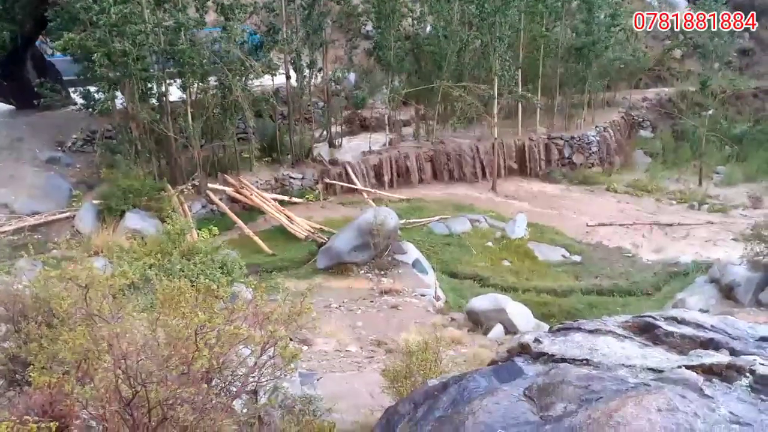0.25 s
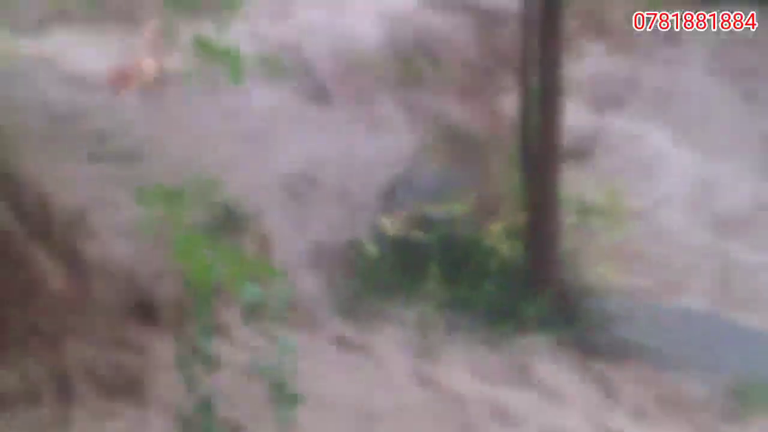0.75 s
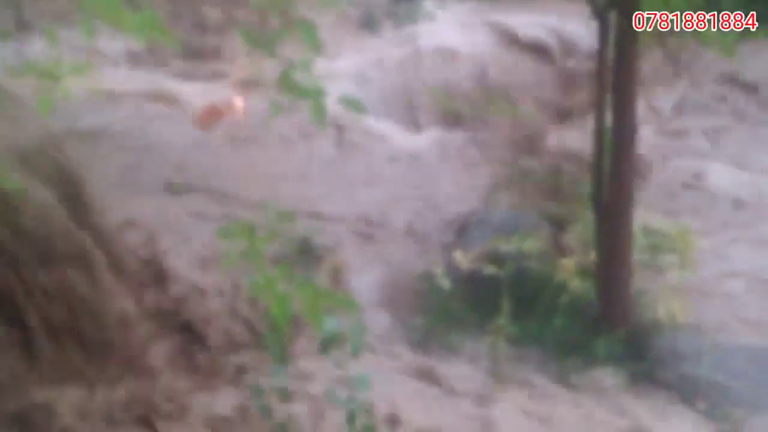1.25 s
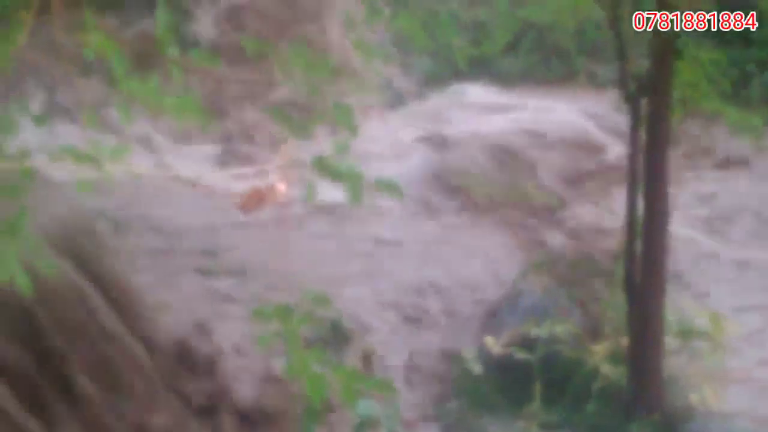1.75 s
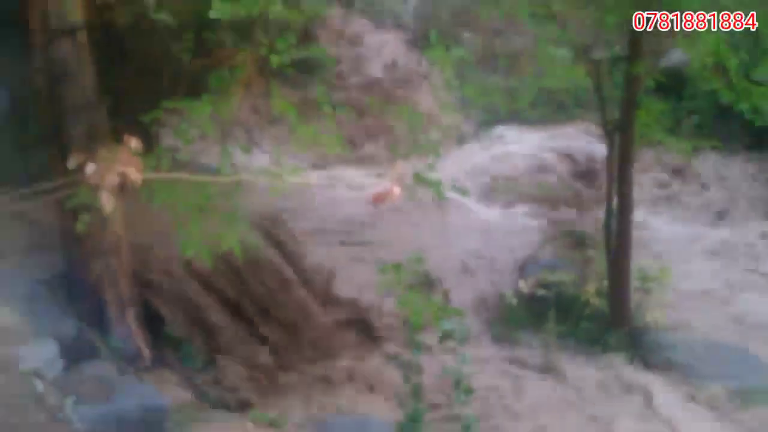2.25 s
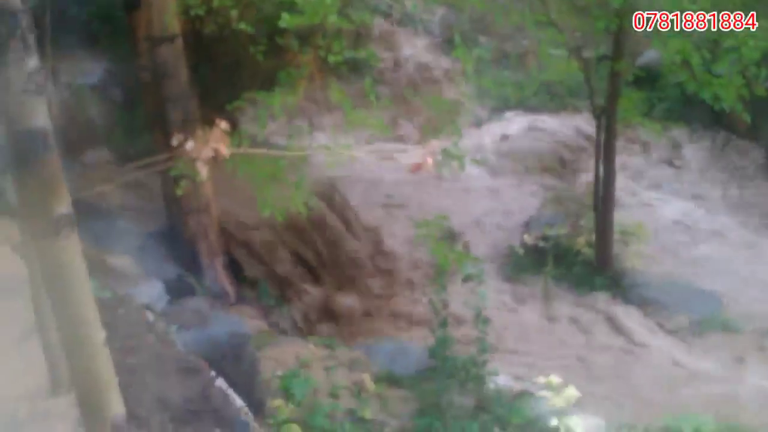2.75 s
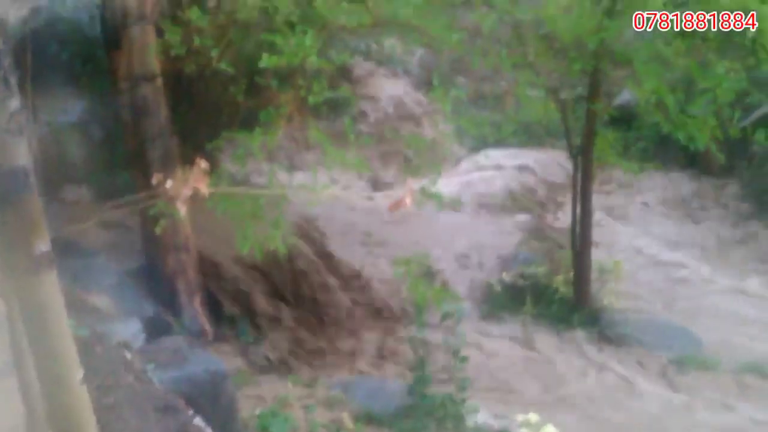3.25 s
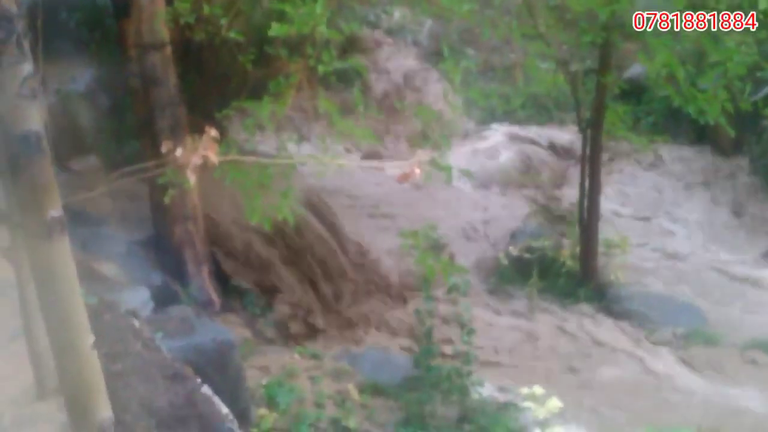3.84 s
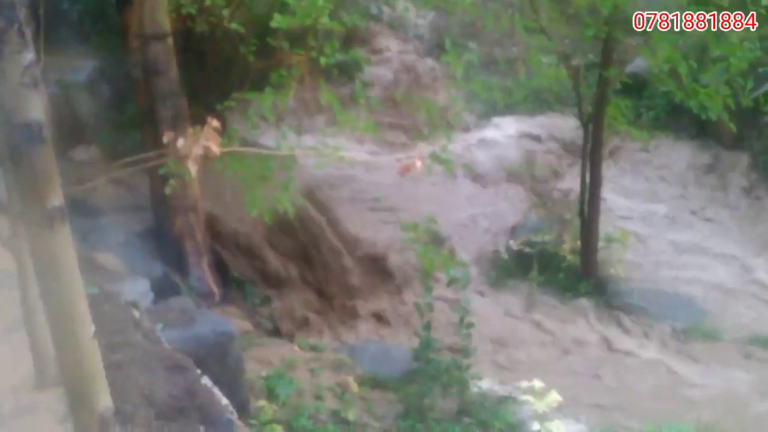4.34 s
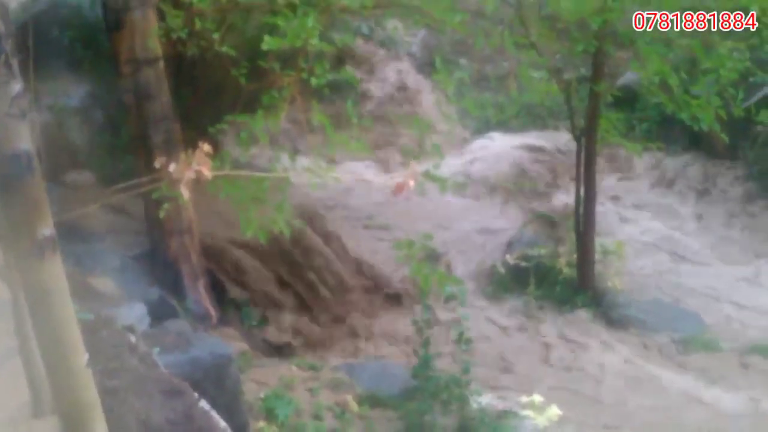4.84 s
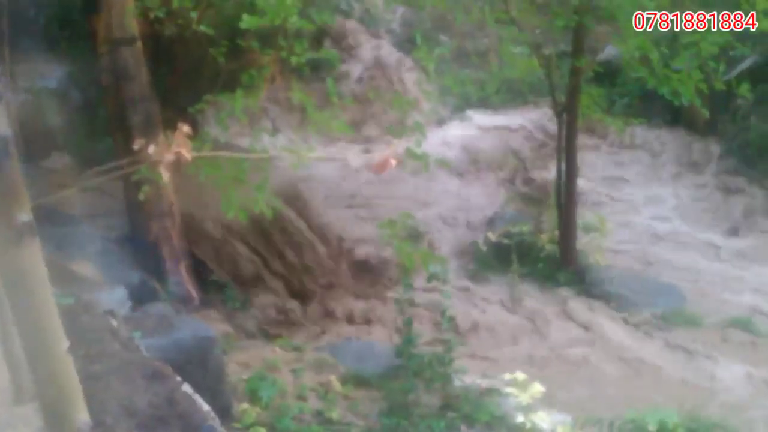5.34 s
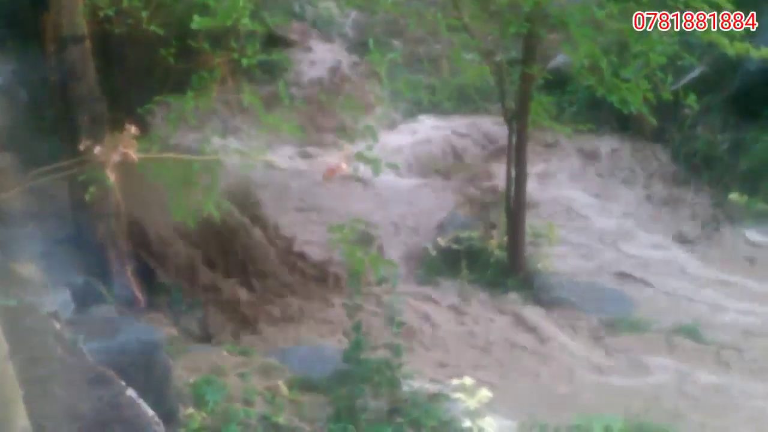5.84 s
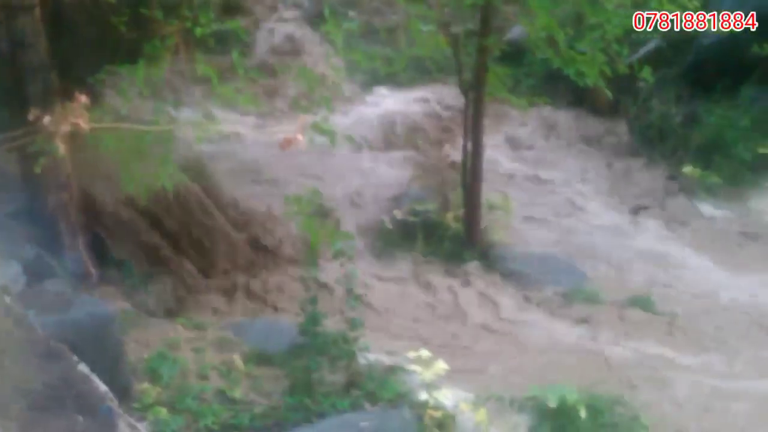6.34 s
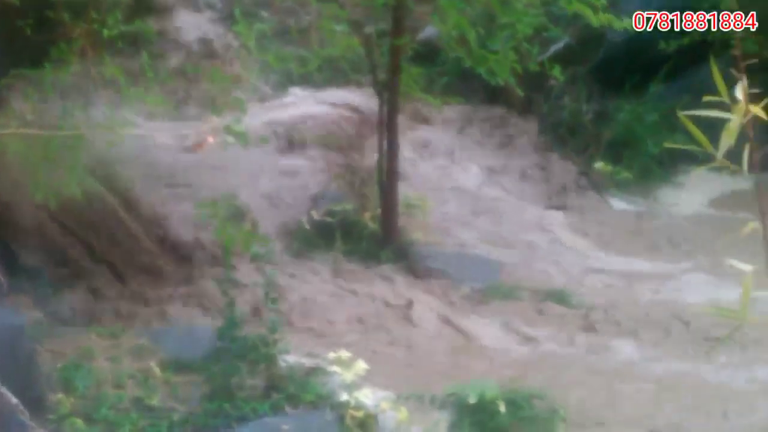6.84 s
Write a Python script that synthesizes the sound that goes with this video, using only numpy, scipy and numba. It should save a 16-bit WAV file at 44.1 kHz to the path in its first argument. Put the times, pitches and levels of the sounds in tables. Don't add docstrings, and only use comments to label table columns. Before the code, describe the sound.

Fat raindrops thump and spatter on taut fabric for half a second, then silence, then a close muddy torrent roars, later growing muffled and gurgling.

```python
import sys
import numpy as np
from scipy import signal
from scipy.fft import rfft, irfft
from scipy.io import wavfile
from scipy.ndimage import uniform_filter1d
from numba import njit

SR = 44100
rng = np.random.default_rng(int(sys.argv[2]) if len(sys.argv) > 2 else 0)


def natural_amplitude(level_db):
    exponent = np.asarray(level_db, float) / 20
    return 10 ** exponent


def materialize(psi):
    bounded = np.clip(np.atleast_2d(psi).T, -1, 1)
    quanta = np.round(bounded * 32767).astype(np.int16)
    wavfile.write(sys.argv[1], SR, quanta)


N = 312228
TIME = np.arange(N) / SR
HZ = np.maximum(np.arange(N // 2 + 1) * SR / N, 1)

# (frequency [Hz], density [dB per Hz])
RAIN_COLOUR = [(18, -51.5), (30, -21), (117, 0), (236, -4), (359, -0.5), (574, -12), (944, -5.5),
               (1100, -10), (3060, -12.5), (7630, -15), (9650, -20.5), (11900, -18), (15400, -22)]
# (frequency [Hz], likeness [0-1])
RAIN_LIKENESS = [(60, 0.87), (130, 0.96), (290, 0.94), (640, 0.9), (1410, 0.17), (3100, 0.03), (6820, 0),
                 (15000, 0.12)]
# (frequency [Hz], left minus right [dB])
RAIN_LEAN = [(60, 5.5), (110, 2), (200, 3), (380, 0.5), (700, 9), (1290, 0.5), (2380, 1.5), (4400, 1.5),
             (8120, -0.5), (15000, -2)]
RAIN_DB, RAIN_TOP_HZ, RAIN_END_S = -26.5, 15550, 0.4962

# (time [s], peak [dB], centre [Hz])
SPATTERS = [
    (0.0165, -9, 4900),
    (0.0658, -16, 6500),
    (0.0834, -12.5, 8500),
    (0.1552, -14.5, 4500),
    (0.1853, -14.5, 7500),
    (0.335, -17.5, 4000),
    (0.38, -18, 5000),
    (0.4152, -16, 4970),
    (0.415, -18.5, 11500),
]
SPATTER_FADE_S = 0.0012
# (time [s], peak [dB], fabric pitch [Hz], right port's lead [ms])
DROPS = [(0.0166, -8, 1580, 0.011), (0.031, -10.5, 920, 0.27), (0.043, -13, 1470, 0.2),
         (0.065, -14, 1580, 0.45), (0.066, -1.5, 850, 0.024), (0.0683, -12.5, 670, 0.07),
         (0.0838, 0.5, 2000, 0.11), (0.086, -17.5, 690, 0.03), (0.096, -14.5, 1050, 0.32),
         (0.098, -16.5, 2010, 0.06), (0.1294, -14, 2440, -0.09), (0.1359, -9, 1100, 0.24),
         (0.1548, -2.5, 1370, 0.1), (0.1574, -1, 1290, 0.29), (0.1607, -17.5, 650, 0.18),
         (0.1837, -1, 1038, 0.14), (0.19, -15.5, 790, 0.24), (0.234, -16, 570, 0.18),
         (0.239, -12.5, 1050, 0.27), (0.2419, -11.5, 2000, 0.16), (0.3353, -4.5, 1460, -0.04),
         (0.277, -17.5, 1380, 0.25), (0.4148, -10.5, 1300, 0.02), (0.426, -13.5, 1580, 0.4),
         (0.4358, -15, 850, 0.45), (0.448, -17.5, 1300, 0.2), (0.4525, -17, 1300, 0.18),
         (0.457, -17, 1050, 0.27), (0.4684, -5, 1050, 0.01), (0.485, -16, 910, 0.22)]
FABRIC_CYCLES = 2.7
DROP_LEFT_DB = -1.2

# (frequency [Hz], density [dB per Hz])
CHURN_COLOUR = [(15, -40), (25, 1.5), (71, 0.5), (129, -3.5), (204, -2.5), (363, -8.5), (447, -13.5),
                (833, -9.5), (1070, -16), (1630, -10.5), (2350, -11.5), (3180, -17.5), (4810, -16),
                (6200, -18), (8060, -32), (13600, -120)]
# (from [Hz], to [Hz])
ZONES_HZ = [(30, 330), (520, 1000), (1200, 5000), (8500, 14000)]
ZONE_EDGES_HZ = [320, 557, 970, 1340]
OPEN_DB = [-21.5, -25.5, -21, -26]
DEPTH_DB = [8.5, 9.5, 14]
# (time [s], effort [0-1])
EFFORT = [(1.3, 0), (2.38, 0.02), (2.5, 0.55), (2.6, 0.8), (2.72, 0.99), (3.2, 0.9), (3.6, 0.95),
          (4.38, 0.92), (4.43, 0.73), (5.0, 0.76), (5.5, 0.73), (5.9, .78), (6.5, 0.76), (7.08, 0.79)]
# (frequency [Hz], gain [dB])
DUCKED = [(200, -1.5), (330, -1.5), (600, -2.4), (1700, 1), (2400, -3.5), (2800, 2), (3450, -3.5),
          (3900, -1), (5000, -8), (6000, -6.5)]
TORRENT_START_S, TORRENT_TOP_HZ = 1.0767, 14240
FADE_IN_S, FADE_FROM_DB = 0.24, -12

# (time [s], lift [dB])
SURGES = [(3.01, 1), (3.2, 0), (3.31, 1), (4.19, 2), (4.45, 1.5), (4.68, 5), (5.01, 8.5), (5.16, 1),
          (5.23, 4.5), (5.7, 2.5), (5.8, 6), (5.89, 5), (5.96, 6), (6.26, 1), (6.36, 3.5), (6.61, 0.5),
          (6.91, 3), (7.03, 6)]
SURGE_SHARE = [1, 0.19, 0.19]
SURGE_S = 0.037

# (frequency [Hz], density [dB per Hz])
SPRAY_COLOUR = [(3060, -43), (5200, -12.5), (7190, -5.5), (7850, -1.5), (10100, 0.5), (13700, -2.5),
                (14200, 0.5)]
# (time [s], lift [dB])
SPLASHES = [(5.7, 1), (5.8, 5), (5.88, 2.5), (5.97, 4.5), (6.05, 1.5), (6.31, 2.5), (6.38, 2), (6.46, 0),
            (6.59, 6), (6.64, 1), (6.91, 1.5), (7.04, 2)]
SPLASH_S = 0.028
SPRAY_CUT_S, SPRAY_SETTLE_S, SPRAY_DEPTH_DB = 5.364, 0.22, 11

# (time [s], peak [dB], pitch [Hz])
GULPS = [(2.832, -17.5, 620), (3.366, -18.5, 750), (3.489, -17.5, 920), (3.793, -16, 713),
         (3.831, -15.5, 790), (4.233, -22, 624), (4.436, -14, 680), (4.529, -12, 870), (4.703, -9.5, 670),
         (4.782, -11, 605), (5.039, -12, 790), (5.09, -23, 726), (5.131, -16, 850), (5.197, -16, 780),
         (5.435, -25, 710), (5.473, -14, 670), (5.538, -10, 702), (5.579, -16, 690), (6.029, -16, 738),
         (6.103, -19, 760), (6.19, -17, 902), (6.341, -12.5, 678), (6.411, -14.5, 736), (6.442, -18, 620),
         (6.496, -16, 920), (6.605, -18, 790), (6.663, -16, 1010), (6.744, -19, 790), (6.785, -21, 710),
         (6.887, -19, 616)]
# (time [s], peak [dB], pitch [Hz])
PLIPS = [(3.2553, -19, 2020), (4.2526, -18, 2050), (4.4067, -19, 1570), (4.4531, -21, 1880),
         (4.5314, -25, 1780), (4.8831, -16, 1610), (4.9819, -16, 1800), (5.0468, -13, 1300),
         (5.1645, -21, 2010), (5.2383, -14, 2200), (5.3371, -16, 1700), (5.4154, -22, 2090),
         (5.7143, -17, 2040), (5.7596, -23, 1950), (5.8075, -16, 1960), (5.9447, -16, 1830),
         (6.059, -18, 1840), (6.1343, -15, 1740), (6.4466, -23, 1550), (6.7304, -29, 1660),
         (6.8666, -17, 1700)]
GULP_CYCLES, PLIP_CYCLES = 52, 88
FROTH_S, FROTH_FROM_DB, FROTH_SLOPE = 0.035, -21.5, 0.25

# (time [s], from [Hz], to [Hz])
WIDE_MOMENTS = [(1.2022, 4130, 5170), (1.2022, 9650, 11700), (1.4112, 6200, 7580), (1.4112, 8960, 11700),
                (1.4576, 11700, 13780), (2.0846, 11700, 13100), (2.2007, 8270, 9650),
                (2.2007, 10340, 12400), (2.3168, 4650, 7580), (2.3168, 9650, 12400), (3.2224, 6200, 7580),
                (3.2688, 4650, 6890), (3.2688, 8960, 10340), (3.292, 5170, 6370), (3.292, 6890, 8960),
                (3.71, 8960, 11020), (4.871, 10340, 11700), (5.3818, 13100, 14240)]
WIDE_DB = -4.5


def on_log(table, hz):
    at, value = np.transpose(table)
    return np.interp(np.log(hz), np.log(at), value)


def level(x, db):
    return x * natural_amplitude(db) / np.sqrt(np.mean(x ** 2))


def zone_db(spectrum, zone):
    low, high = ZONES_HZ[zone]
    inside = (HZ > low) & (HZ < high)
    return 10 * np.log10(np.sum(abs(spectrum[inside]) ** 2) * 2 / N ** 2)


def bandpass(x, low_hz, high_hz):
    return signal.sosfilt(signal.butter(2, [low_hz, high_hz], "band", fs=SR, output="sos"), x)


def walk(rate):
    hold = int(SR / rate)
    steps = np.repeat(rng.standard_normal(N // hold + 1), hold)
    slow = uniform_filter1d(uniform_filter1d(steps, hold), hold)[:N]
    return slow / slow.std()


def bumps(table, t, width_s):
    return sum(db * np.exp(-((t - s) / width_s) ** 2) for s, db in table)


@njit
def rings(start, hz, cycles, size, glide, length):
    out = np.zeros(length)
    for k in range(len(start)):
        first = int(start[k]) + 1
        last = min(length, first + int(cycles[k] * SR / hz[k]))
        for i in range(first, last):
            turns = (i - start[k]) * hz[k] / SR
            fade = 1000 ** (-turns / cycles[k])
            out[i] += size[k] * np.sin(2 * np.pi * turns * (1 + glide * turns / 2)) * fade
    return out


def bubbles(count, low_hz, high_hz, cycles, spread_db, glide, end_s):
    when, pitch, loudness, sign = rng.random((count, 4)).T
    hz = low_hz * (high_hz / low_hz) ** pitch
    size = np.sign(sign - 0.5) * natural_amplitude(-spread_db * np.log(1 - 0.96 * loudness))
    cloud = rings(when * end_s * SR, hz, cycles + 0 * hz, size, glide, N)
    return cloud / np.sqrt(np.mean(cloud[:int(end_s * SR)] ** 2))


def rain():
    alike = np.clip(on_log(RAIN_LIKENESS, HZ), 0, 1)
    colour = natural_amplitude(on_log(RAIN_COLOUR, HZ))
    mid = rfft(rng.standard_normal(N)) * colour * np.sqrt(1 + alike)
    side = rfft(rng.standard_normal(N)) * colour * np.sqrt(1 - alike)
    lean = natural_amplitude(on_log(RAIN_LEAN, HZ) / 2)
    hiss = level(irfft(np.array([(mid + side) * lean, (mid - side) / lean]), N), RAIN_DB)
    patter = bubbles(count=250, low_hz=505.0, high_hz=2500.0, cycles=6.4, spread_db=1.0, glide=0.0, end_s=0.5)
    lagged = np.array([np.roll(patter, 8), patter])
    return hiss * natural_amplitude(0.63 * walk(8.1)) + natural_amplitude(-37.5) * lagged


def spatters():
    out = np.zeros((2, N))
    fade = np.exp(-TIME[:400] / SPATTER_FADE_S)
    for s, db, hz in SPATTERS:
        at = int(s * SR)
        burst = rng.standard_normal((2, 400)) * fade
        out[:, at:at + 400] += natural_amplitude(db) * bandpass(burst, hz / 1.7, min(hz * 1.35, 16000.0))
    return out


def drops():
    s, db, hz, lead_ms = np.transpose(DROPS).astype(float)
    ports = []
    for side in (1, -1):
        start = (s - (side < 0) * lead_ms / 1000) * SR
        size = natural_amplitude(db + side * DROP_LEFT_DB / 2)
        thump_hz = np.minimum(0.85 * hz, 1500.0)
        thump = rings(start, thump_hz, FABRIC_CYCLES + 0 * hz, natural_amplitude(2.7) * size, 0.0, N)
        slap = rings(start, 2.0 * hz, 10.0 + 0 * hz, natural_amplitude(-12.5) * size, 0.0, N)
        hits = np.bincount(start.astype(int), size, N)
        envelope = signal.lfilter([1], [1, -np.exp(-1 / (0.0016 * SR))], hits)
        ports.append(thump + slap + natural_amplitude(-16.5) * envelope * rng.standard_normal(N))
    return bandpass(ports, 420.0, 6000.0)


def fade_in_db(t):
    return FADE_FROM_DB * np.clip(1 - (t - TORRENT_START_S) / FADE_IN_S, 0, 1) ** 1.15


def water():
    fade = 1 / (1 + (HZ / 7600.0) ** 12) / (1 + (20.0 / HZ) ** 2)
    churn = rfft(rng.standard_normal(N)) * natural_amplitude(on_log(CHURN_COLOUR, HZ)) * fade
    churn *= natural_amplitude(-zone_db(churn, zone=2))
    gurgle = bubbles(count=700, low_hz=584.0, high_hz=959.0, cycles=19.4, spread_db=3.0, glide=0.023, end_s=7.08)
    slosh = bubbles(count=400, low_hz=88.0, high_hz=314.0, cycles=6.8, spread_db=5.0, glide=0.02, end_s=7.08)
    fizz = bubbles(count=2500, low_hz=1220.0, high_hz=2930.0, cycles=24.5, spread_db=4.0, glide=0.0062,
                   end_s=7.08)
    return churn + rfft(natural_amplitude(-11) * gurgle + natural_amplitude(-9.5) * slosh + natural_amplitude(-9) * fizz)


def suppressor(spectrum):
    hz, at, cells = signal.stft(irfft(spectrum, N), SR, nperseg=1024, noverlap=768)
    effort = np.clip(np.interp(at, *np.transpose(EFFORT)), 0, 1.2)
    surge_db = bumps(SURGES, at, SURGE_S)
    gain_db = np.array([OPEN_DB[k] - DEPTH_DB[k] * effort + SURGE_SHARE[k] * surge_db + fade_in_db(at)
                        - zone_db(spectrum, k) for k in range(3)])
    froth = [(s, FROTH_SLOPE * max(db - FROTH_FROM_DB, 0)) for s, db, _ in GULPS]
    gain_db[1] += bumps(froth, at, FROTH_S)
    place = on_log(list(zip(ZONE_EDGES_HZ, [0, 1, 1, 2])), hz + 1)
    share = np.clip(1 - abs(np.arange(3) - place[:, None]), 0, 1)

    power = abs(cells) ** 2
    power = np.minimum(power / np.mean(power, axis=1, keepdims=True), 8.0)
    lumps = uniform_filter1d(uniform_filter1d(power, size=5, axis=1), size=3, axis=0)
    patches = uniform_filter1d(rng.standard_normal(power.shape), size=14, axis=1)
    patches = uniform_filter1d(patches, size=7, axis=0)
    keep = lumps ** (0.02 + 0.21 * effort) * natural_amplitude((0.76 + 0.64 * effort) * patches / patches.std())

    zones = [(hz > low) & (hz < high) for low, high in ZONES_HZ[:3]]
    swell = [np.mean((keep * abs(cells))[zone] ** 2, axis=0) for zone in zones]
    steady = np.array([np.mean(abs(cells[zone]) ** 2) for zone in zones])
    keep /= share @ np.sqrt(uniform_filter1d(swell, size=21) / steady[:, None])
    keep *= natural_amplitude(on_log(DUCKED, hz + 1)[:, None] * effort ** 3) * (hz < 11000)[:, None]
    ducked = cells * keep * natural_amplitude(share @ gain_db)
    return signal.istft(ducked, SR, nperseg=1024, noverlap=768)[1][:N]


def spray():
    hiss = rfft(rng.standard_normal(N)) * natural_amplitude(on_log(SPRAY_COLOUR, HZ))
    hiss *= (HZ < TORRENT_TOP_HZ) / (1 + (4500.0 / HZ) ** 8)
    hiss *= natural_amplitude(-zone_db(hiss, zone=3))
    upper = np.clip((HZ - 9500.0) / 2100.0, 0, 1)
    halves = sum(irfft(hiss * part, N) * natural_amplitude(0.56 * walk(13)) for part in (upper, 1 - upper))
    cut = 1 - np.exp(-np.maximum(TIME - SPRAY_CUT_S, 0) / SPRAY_SETTLE_S)
    lift_db = bumps(SPLASHES, TIME, SPLASH_S) + 1.2 * cut * walk(13)
    return halves * natural_amplitude(OPEN_DB[3] + fade_in_db(TIME) - SPRAY_DEPTH_DB * cut + lift_db)


def air_pockets(table, cycles, trim_db, low_hz, high_hz):
    s, db, hz = np.transpose(table).astype(float)
    pockets = rings(s * SR, hz, cycles + 0 * hz, natural_amplitude(db + trim_db), 0.0017, N)
    return bandpass(pockets, low_hz, high_hz)


def torrent():
    gulps = air_pockets(GULPS, GULP_CYCLES, -6.5, 480.0, 1100.0)
    plips = air_pockets(PLIPS, PLIP_CYCLES, -8.0, 1000.0, 2600.0)
    return suppressor(water()) + spray() + gulps + plips


def widen_treble(x):
    out = x.copy()
    window = np.sin(np.pi * np.arange(2048) / 2048)
    hz = np.arange(1025) * SR / 2048
    for s, low, high in WIDE_MOMENTS:
        at = int(s * SR) - 1024
        band = (hz > low) & (hz < high)
        now = irfft(rfft(x[0, at:at + 2048]) * band) * window
        later = irfft(rfft(x[0, at + 3000:at + 5048]) * band) * window
        out[:, at:at + 2048] += natural_amplitude(WIDE_DB) * later * np.array([[1], [-1]])
        out[:, at:at + 2048] -= (1 - np.sqrt(0.5)) * now * window
    return out


def scene():
    cover = irfft(rfft(rain() + spatters() + drops()) * (HZ < RAIN_TOP_HZ), N)
    cover *= np.clip((RAIN_END_S - TIME) / 0.0007, 0, 1)
    bank = torrent() * np.clip((TIME - TORRENT_START_S) / 0.0072, 0, 1)
    return cover + bank


def low_pass(x):
    return signal.sosfilt(signal.butter(12, 15600, fs=SR, output="sos"), x)


def record(dry):
    return low_pass(widen_treble(dry))


dry = scene()
out = record(dry)
materialize(out)
```